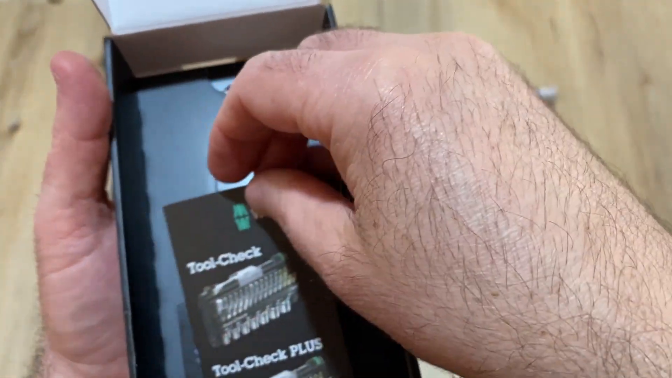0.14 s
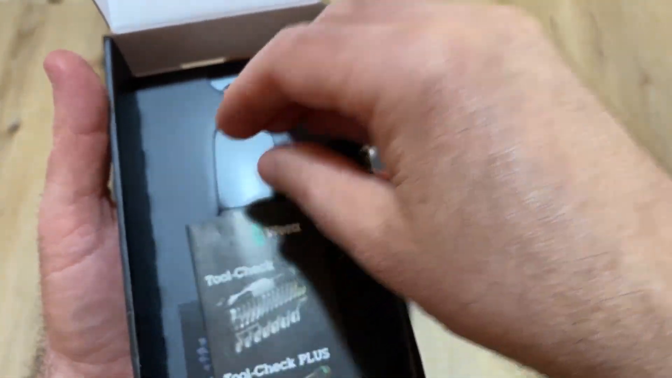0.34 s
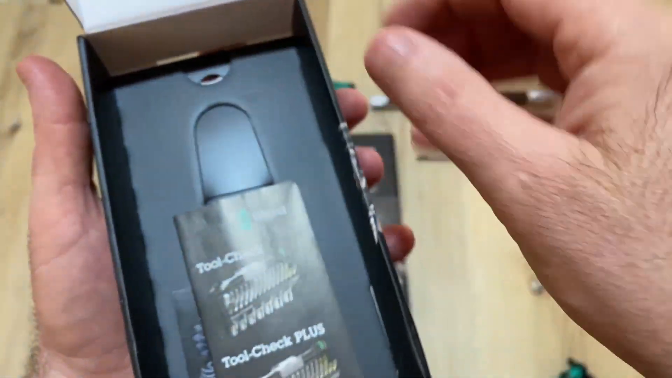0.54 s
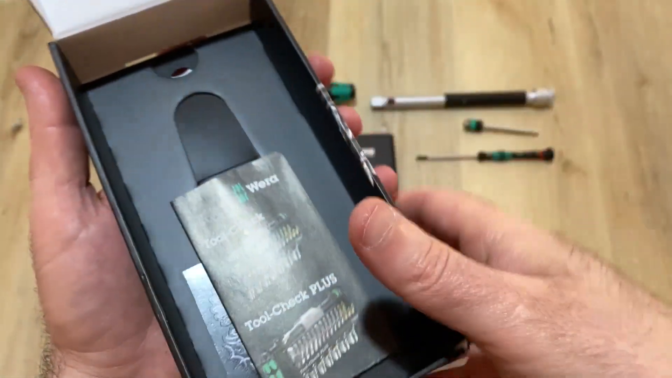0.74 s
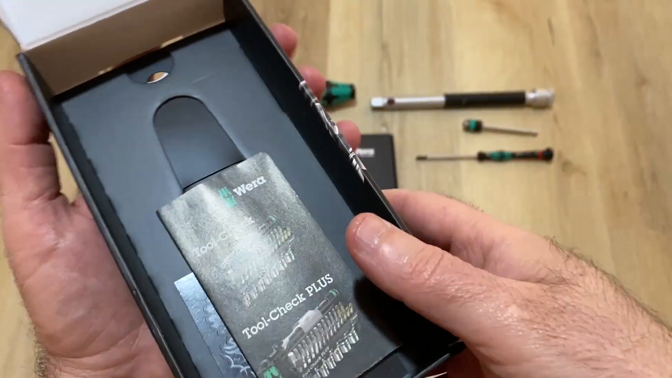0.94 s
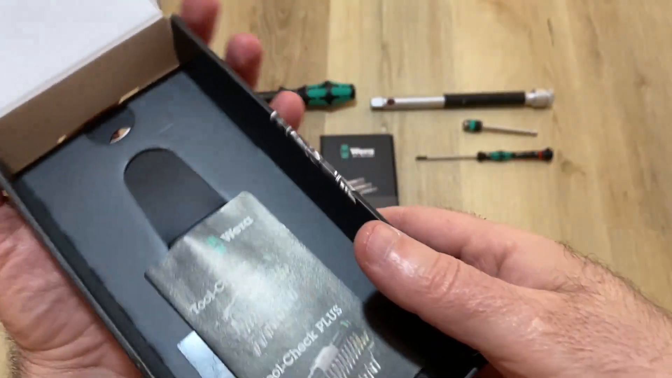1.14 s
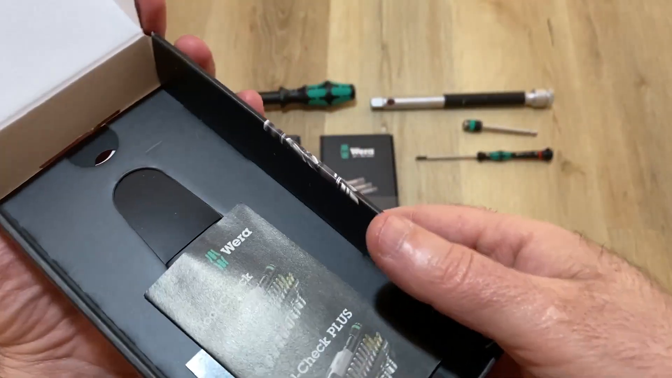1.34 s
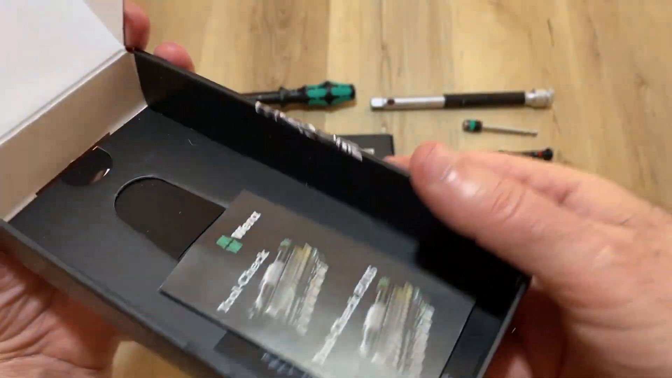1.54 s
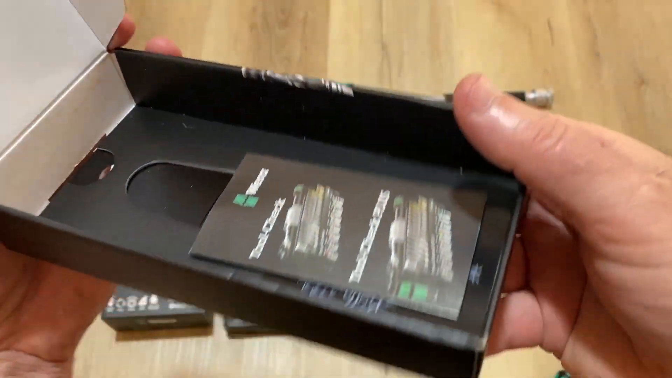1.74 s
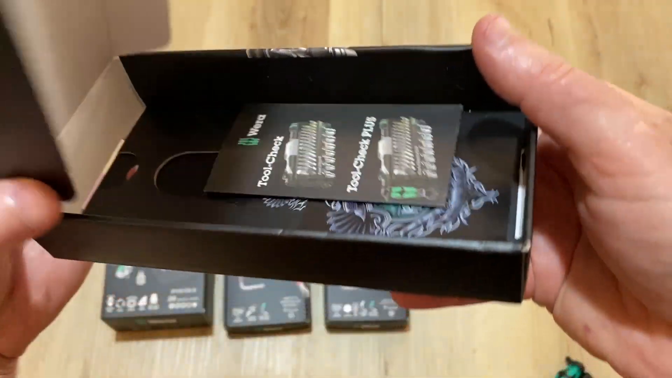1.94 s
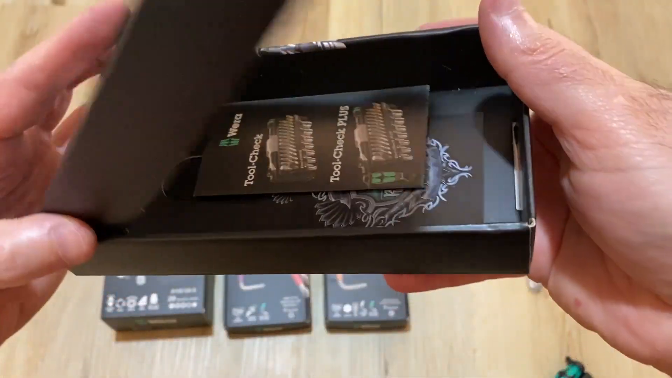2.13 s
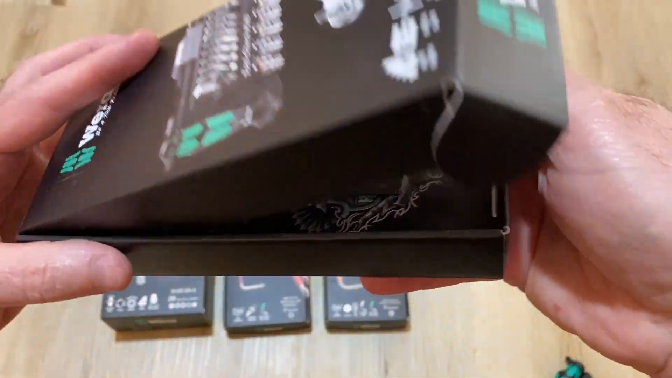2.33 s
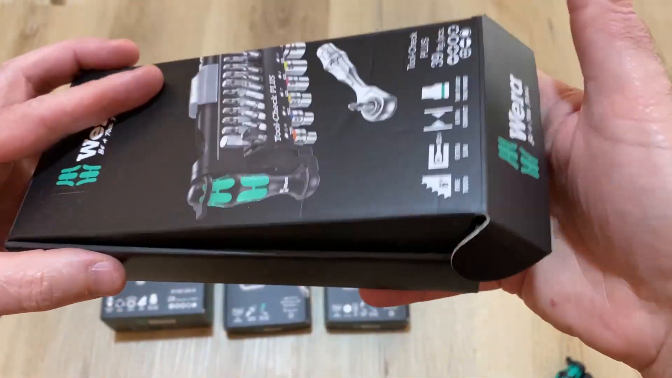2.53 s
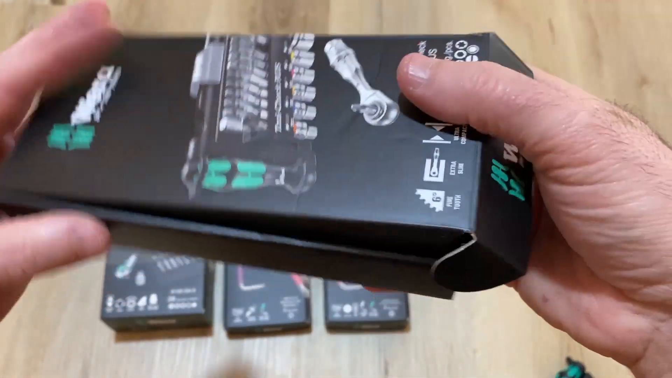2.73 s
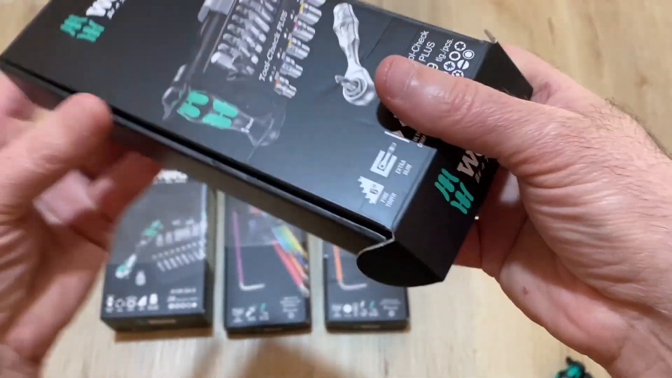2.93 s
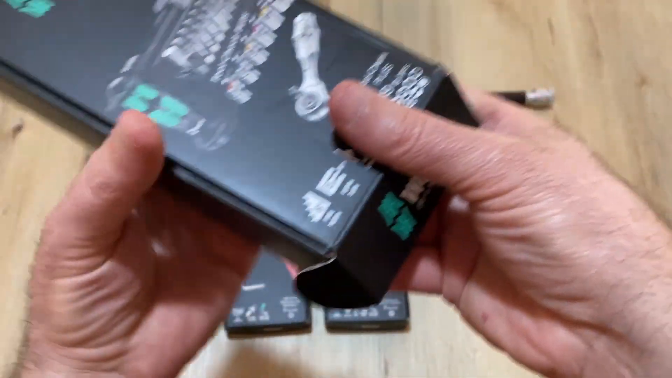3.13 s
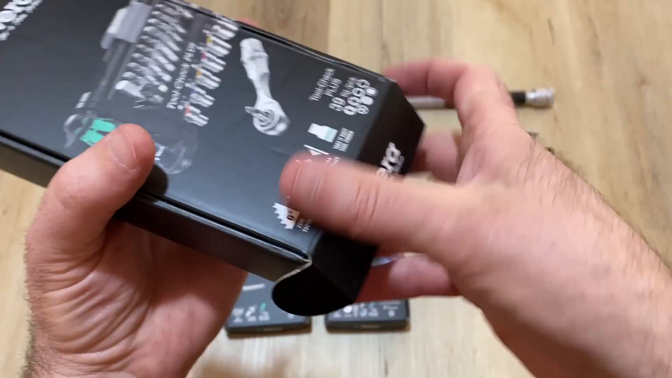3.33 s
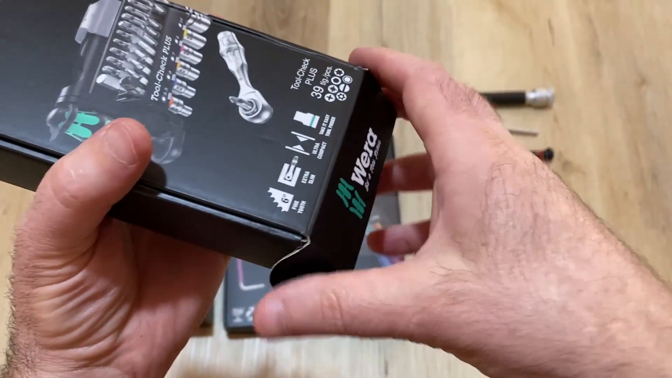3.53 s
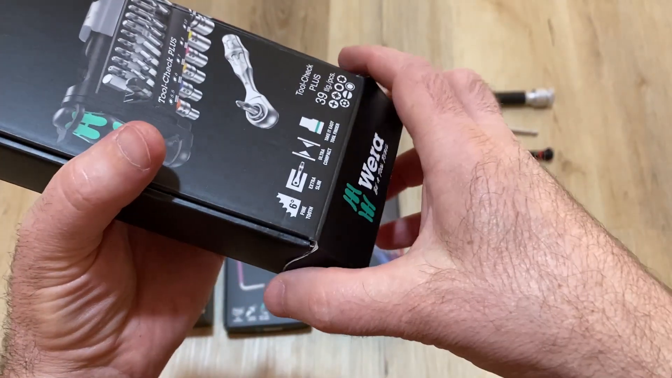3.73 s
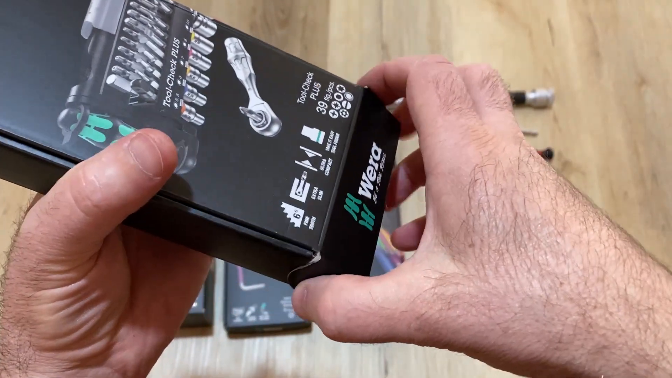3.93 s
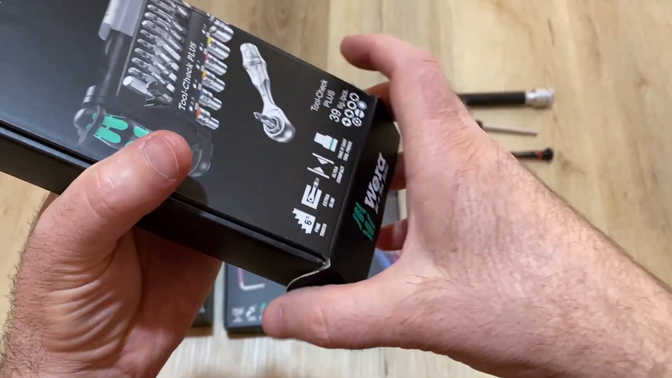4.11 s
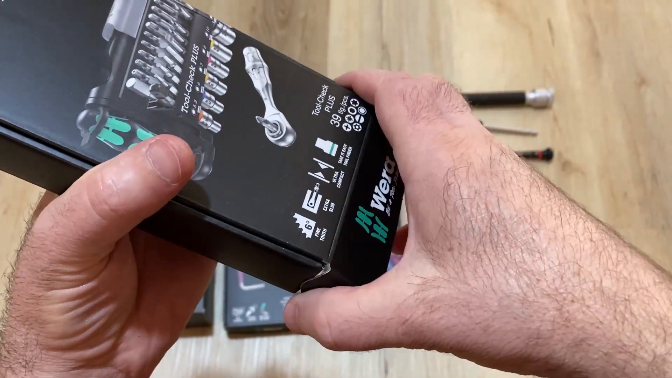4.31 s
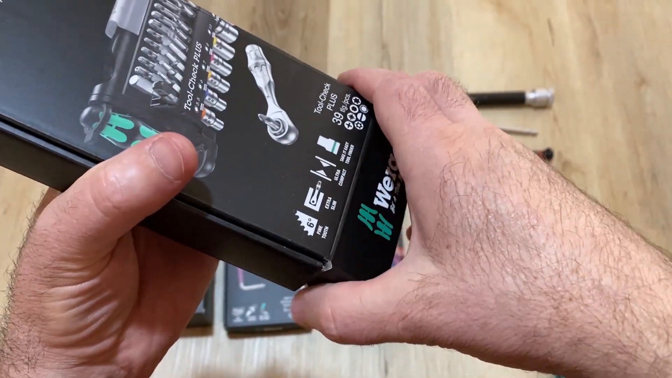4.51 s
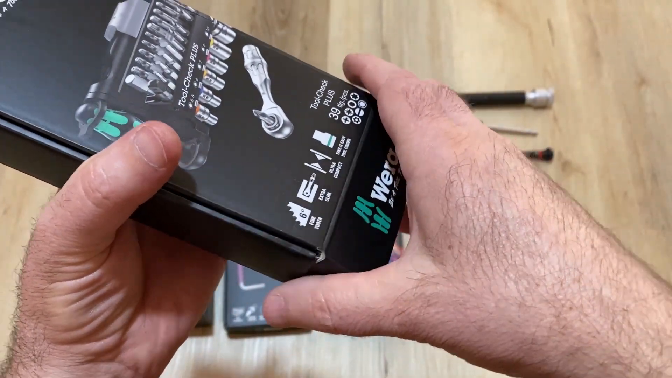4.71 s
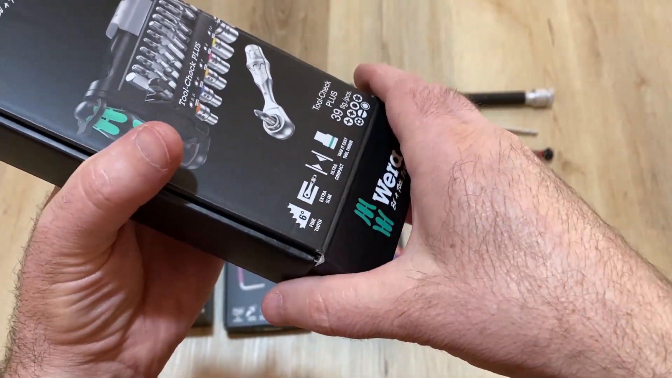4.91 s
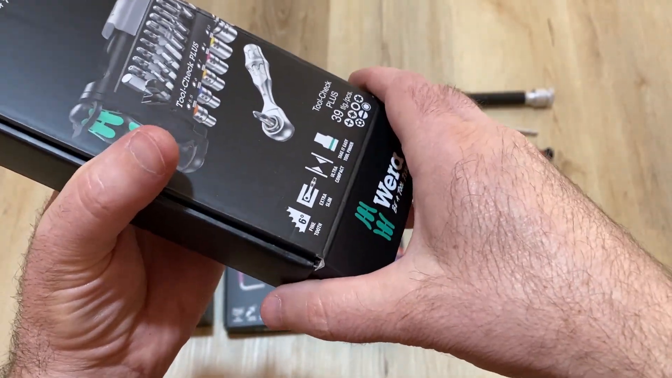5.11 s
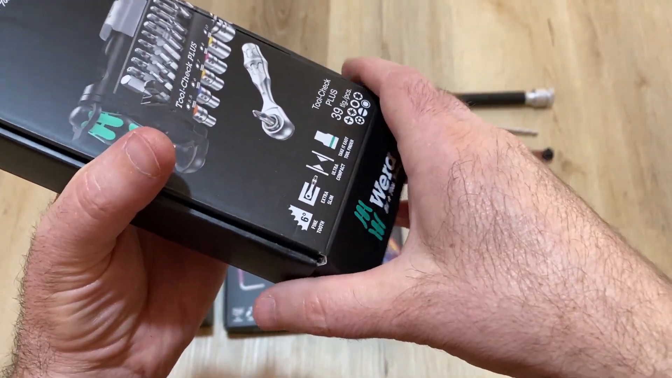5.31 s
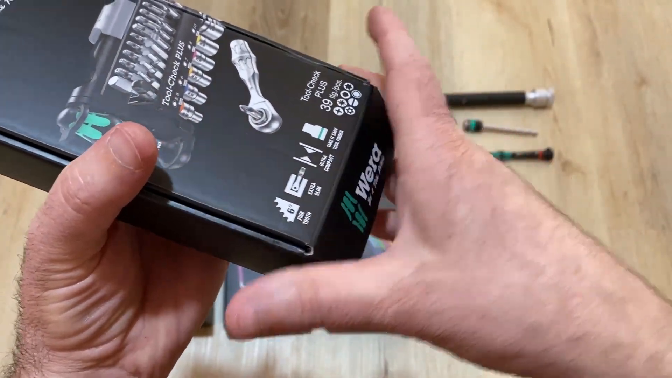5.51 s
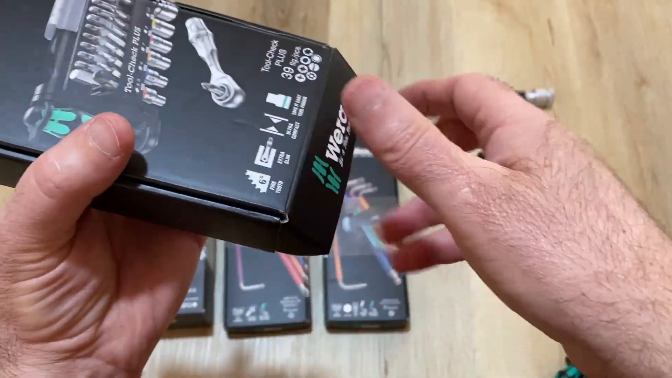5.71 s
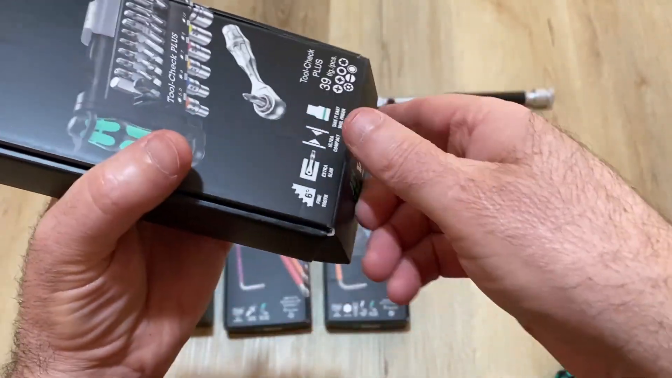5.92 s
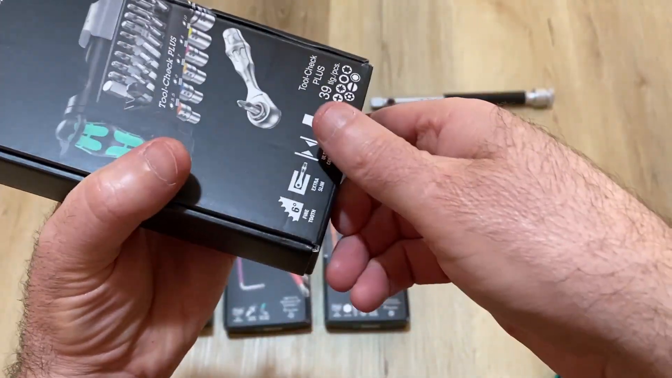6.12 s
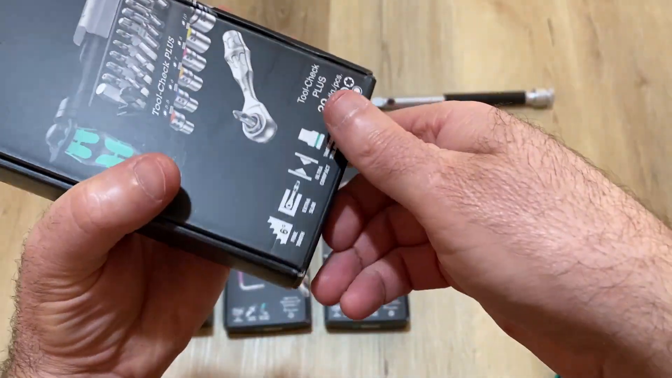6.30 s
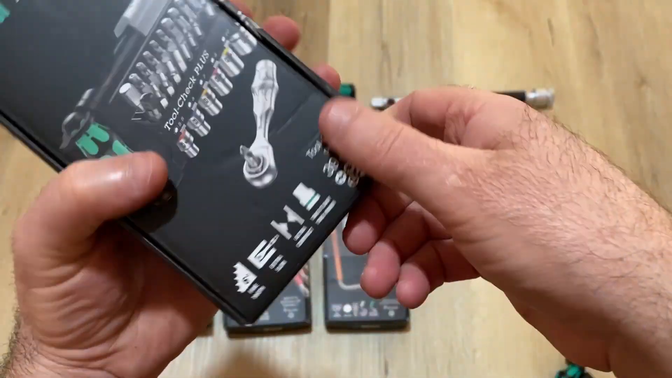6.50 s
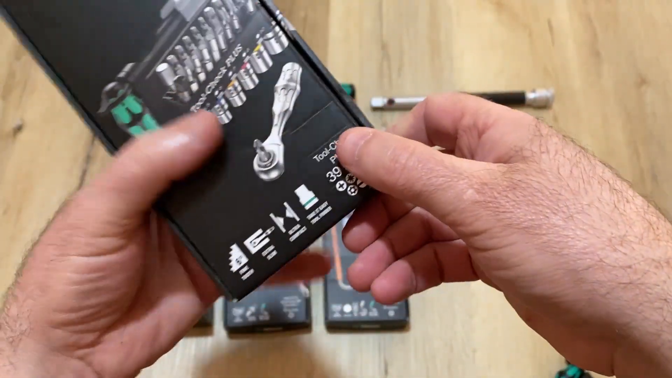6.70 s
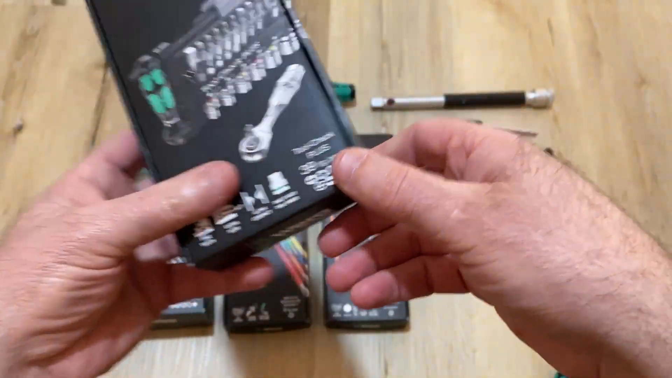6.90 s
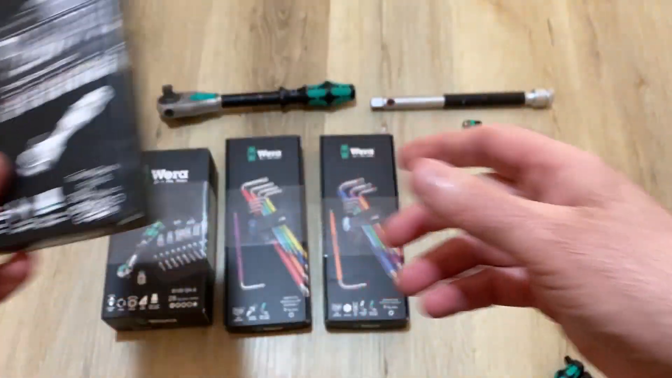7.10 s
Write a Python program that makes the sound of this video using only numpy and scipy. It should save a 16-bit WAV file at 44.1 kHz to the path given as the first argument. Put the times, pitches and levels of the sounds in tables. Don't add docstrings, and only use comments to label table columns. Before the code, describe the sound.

Close indoor handling of a hollow card box: dry paper scuffs, bright finger hiss and low hand rumble over faint room tone. A flap knocks at about two seconds, the lid creaks and rasps down, its corners click in. After a quieter stretch the tabs snap loudly, another hard clack comes soon after, and light rubbing continues to the end. Short room reflections, slight stereo movement.

```python
import sys
import numpy as np
from scipy import signal
from scipy.fft import rfft, irfft, next_fast_len
from scipy.io import wavfile
from scipy.ndimage import uniform_filter1d, map_coordinates

SR = 44100
rng = np.random.default_rng(int(sys.argv[2]) if len(sys.argv) > 2 else 0)


def digitize_waveform(pressure):
    field = np.atleast_2d(pressure).T
    bounded = np.clip(field, -1, 1)
    quanta = np.round(bounded * 32767).astype(np.int16)
    wavfile.write(sys.argv[1], SR, quanta)


def field_ratio(decibels):
    return 10 ** (np.asarray(decibels, dtype=float) / 20)


N = 315315

# f/Hz, drift/rad
PORT_LOOSE = [(200, .22), (700, .45), (1400, .85), (2500, 1.1), (4000, .9), (6000, .65), (8300, 1.05),
              (10500, .3), (14000, .12)]
SIDE = np.array([[.5], [-.5]])
SOFT_TOP_HZ = 16000


def unit(x):
    return x / np.sqrt(np.mean(x ** 2) + 1e-20)


def along(points, hz):
    f, v = np.transpose(points)
    return np.interp(np.log(hz + 1), np.log(f + 1), v)


def wobble(rate):
    knots = rng.standard_normal(int(N * rate / SR) + 4)
    return map_coordinates(knots, [np.arange(N) * rate / SR])


def patches(shape, bins, frames):
    field = uniform_filter1d(rng.standard_normal(shape), size=bins, axis=0)
    return unit(uniform_filter1d(field, size=frames, axis=1))


def filtered(x, response):
    m = 2 * next_fast_len(N // 2 + SR // 4, real=True)
    return irfft(rfft(x, m) * response(np.fft.rfftfreq(m, 1 / SR)), m)[..., :N]


def peak(f, hz, width):
    return 1j * f * width / (hz * hz - f * f + 1j * f * width)


def ringing(f, peaks):
    return sum((-1) ** k * field_ratio(db) * peak(f, hz, width) for k, (hz, width, db) in enumerate(peaks))


def causal(gain):
    cep = irfft(np.log(gain + 1e-5))
    cep[1:len(cep) // 2] *= 2
    cep[len(cep) // 2 + 1:] = 0
    return np.exp(rfft(cep))


def friction(response, grit_db, patchy_db):
    lumpy = rng.standard_normal(N) * field_ratio(grit_db * wobble(400))
    z = signal.stft(lumpy, nperseg=512)[2]
    z = z * field_ratio(patchy_db * patches(z.shape, bins=6, frames=8))
    return unit(filtered(signal.istft(z, nperseg=512)[1][:N], response))


def strokes(rows, on_db_s, off_db_s):
    t, power = np.arange(0, N, 32) / SR, 0
    for s, length, db, drift_db in rows:
        held_db = drift_db * np.clip((t - s) / max(length, 1 / SR), 0, 1)
        before_db = on_db_s * np.maximum(s - t, 0)
        after_db = off_db_s * np.maximum(t - s - length, 0)
        power = power + field_ratio(2 * (db + held_db - before_db - after_db))
    return np.interp(np.arange(N) / SR, t, np.sqrt(power))


def background():
    # f/Hz, level/dB per Hz
    rumble_colour = [(15, -38), (25, 2.5), (65, 3), (121, -5.5), (152, -7), (221, -5), (464, -16),
                     (500, -14.5), (650, -38.5), (1100, -120)]
    # f/Hz, level/dB per Hz
    quiet = [(180, -15.5), (300, -21), (472, -8), (660, -2.5), (1150, -27.5), (1630, -10.5), (2100, -25.5),
             (2320, -26), (16500, -34.5)]
    # t/s, level/dB
    jolt_rows = [(.166, -62), (.364, -53.5), (.95, -64), (1.312, -71), (2.05, -49.5), (2.15, -56),
                 (2.55, -59), (2.73, -63.5), (3.17, -62), (4.1, -66), (4.5, -49.5), (4.58, -61.5),
                 (4.81, -79), (4.942, -64), (5.09, -61.5), (5.41, -58), (5.905, -59.5), (5.98, -60.5),
                 (6.1, -59.5), (6.562, -71), (6.814, -64)]
    rumble = friction(lambda f: field_ratio(along(rumble_colour, f)), grit_db=-4.0, patchy_db=3.5)
    tone = friction(lambda f: field_ratio(along(quiet, f)), grit_db=4, patchy_db=2.0)
    jolts = strokes([(s, 0, db, 0) for s, db in jolt_rows], on_db_s=226.5, off_db_s=142)
    tremor_db, tiring_db_s = -65.5, -1
    arms = np.hypot(jolts, field_ratio(tremor_db + tiring_db_s * np.arange(N) / SR))
    lumps = field_ratio(2.5 * wobble(13))
    return arms * unit(rumble * lumps) + field_ratio(-79.5) * tone


def room(x):
    # f/Hz, t60/s
    decay = [(150, 0.33), (1000, 0.24), (5000, 0.54), (14000, 0.18)]
    hz, t, z = signal.stft(np.pad(x, (300, 0))[:N], SR, nperseg=256)
    power = uniform_filter1d(np.abs(z) ** 2, size=7, axis=0)
    keep = field_ratio(-120 * t[1] / along(decay, hz))
    held = np.array([signal.lfilter([1 - k], [1, -k], p) for k, p in zip(keep, power)])
    same, other = signal.stft(rng.standard_normal((2, N)), nperseg=256)[2]
    apart = np.clip(0.71 * along(PORT_LOOSE, hz), 0, np.pi / 4)[:, None]
    pair = np.cos(apart) * same + np.multiply.outer([1, -1], np.sin(apart) * other)
    size = np.sqrt(np.abs(held) / np.mean(np.abs(same) ** 2)) * (hz < SOFT_TOP_HZ)[:, None]
    return signal.istft(pair * size, nperseg=256)[1][:, :N]


def thumps():
    # t/s, peak level/dB, f/Hz, t60/s
    pushes = [(0.004, -48.5, 105.8, 0.33), (0.054, -49.5, 107, 0.11), (0.152, -41.5, 262, 0.06),
              (0.354, -26, 367, 0.014), (0.368, -33.5, 245, 0.027), (0.834, -47.5, 102, 0.098),
              (1.275, -45.5, 73, 0.17), (1.46, -49.5, 56.5, 0.092), (1.982, -24.5, 266.6, 0.076),
              (2.038, -31.5, 148, 0.11), (2.144, -50, 300, 0.13), (2.406, -60, 340, 0.14),
              (2.719, -40, 62.6, 0.14), (3.133, -46.5, 103, 0.053), (3.299, -58.5, 232, 0.11),
              (3.77, -54.5, 128, 0.15), (4.074, -56, 75, 0.049), (4.496, -14.5, 129, 0.038),
              (4.53, -37.5, 119, 0.19), (4.642, -44.5, 91.5, 0.062), (5.378, -51, 270, 0.051),
              (5.898, -42, 158, 0.035), (1.9825, -24, 517, 0.016), (2.034, -29, 510, 0.018),
              (4.494, -30, 416, 0.02), (1.219, -58, 270, 0.16), (1.951, -38.5, 328, .03),
              (5.135, -43, 180, 0.052), (6.823, -46, 100.6, 0.088)]
    out, t = np.zeros(N + SR), np.arange(SR // 3) / SR
    for s, db, hz, t60 in pushes:
        swing = np.sin(2 * np.pi * hz * (t + 0.0007 * (1 - np.exp(-t / 0.00087))))
        onset = 1 - np.exp(-t / 0.0015)
        out[round(s * SR):][:len(t)] += field_ratio(db - 0.5 - 60 * t / t60) * onset * swing
    return out[:N]


def lifted():
    # t/s, sinking of the strokes and grips just before/dB
    landings = [(.831, 7.5), (5.89, 27), (6.38, 8.5), (7.035, 6.5)]
    lift_s = 0.057
    s, depth_db = np.transpose(landings)
    ahead = np.subtract.outer(s, np.arange(N) / SR)
    return field_ratio(-depth_db @ ((ahead > 0) * np.exp(-np.abs(ahead) / lift_s)))


def scuffs():
    # t/s, peak level/dB, hiss/dB re peak, rise/s, tab resonance f/Hz
    drags = [(0.149, -51.5, 4, 0.0017, 3020), (.829, -81, 15, 0.0024, 2500), (2.48, -35, 6, 0.014, 2970),
             (2.5, -33.5, 9, 0.012, 3060), (2.7065, -41.5, 8.5, 0.014, 2630),
             (3.173, -36, -3, 0.0047, 3700), (3.238, -35, 10, 0.0012, 3500), (3.294, -42, 4, 0.0067, 2870),
             (3.495, -56.5, 13, 0.0037, 4630), (3.589, -60, -10, .02, 4570),
             (3.615, -59.5, -5, 0.019, 4600), (3.985, -42.5, 8, 0.0062, 1450),
             (5.084, -56.5, 6.5, 0.008, 900), (5.132, -33.5, -24.5, 0.018, 2970),
             (5.8899, -50, 12.5, 0.0036, 2200), (6.379, -69, 2.5, 0.0026, 4500),
             (7.036, -65, -1, 0.006, 4960)]
    t60 = 0.039
    card, hiss, tab = np.zeros((3, N + SR))
    t = np.arange(SR // 10) / SR
    for s, db, hiss_db, rise, hz in drags:
        swell = np.clip(t / rise, 0, 1) * field_ratio(db - 9.0 - 60 * np.maximum(t - rise, 0) / t60)
        ring = signal.lfilter(*signal.iirpeak(hz, 3.5, SR), rng.standard_normal(len(t)))
        at = slice(round(s * SR), round(s * SR) + len(t))
        card[at] += swell
        hiss[at] += field_ratio(hiss_db + 0.5) * swell
        tab[at] += field_ratio(7) * swell * unit(ring)
    catches = field_ratio(3.5 * wobble(230))
    return catches * card[:N], hiss[:N], catches * tab[:N]


def card_on_card(scuff, pressure, lift):
    # start t/s, length/s, level/dB,
    # drift/dB over the stroke, air hum/dB re level
    card_strokes = [(0, 0.045, -61.5, -8, -5), (.106, 0.11, -64, 4.5, -9), (.25, 0.088, -66.5, 1.5, -4),
                    (.38, .05, -80, -3, 18), (.47, 0.256, -88, 11, 15.5), (.79, 0.15, -59.5, -2, -5),
                    (.96, 0.34, -66, 2.5, -3.5), (1.3, 0.16, -69, 9, -8), (1.52, 0.063, -58.5, 0.5, -11),
                    (1.63, 0.24, -67.5, -5, -2), (1.85, 0.23, -66.5, 16, -8), (2.04, 0.15, -50.5, 4.5, -8),
                    (2.164, 0.31, -54, 5, -10), (2.552, 0.0025, -38.5, -2, -18),
                    (2.62, 0.053, -65, 5.5, -7.5), (2.7, 0.0051, -62.5, 14.5, -2),
                    (2.77, 0.096, -53.5, 10, -10), (2.9, 0.19, -55.5, 3.5, -5),
                    (3.25, 0.01, -58.5, -22, 8.5), (3.302, 0.015, -72.5, -6, 16.5),
                    (3.36, 0.13, -75, -6, -15.5), (3.5, 0.0093, -74, 3, 0),
                    (3.6, 0.053, -73, 2, 2.5), (3.66, 0.0081, -70, -4, 11), (3.742, 0.071, -60.5, 3.5, 6.5),
                    (3.85, 0.099, -59.5, 4.5, 1.5), (4.045, 0.029, -60.5, 1, 6), (4.19, 0.014, -67, -4, 9),
                    (4.253, 0.069, -57, 2, 4.5), (4.41, 0.096, -70, 18.5, 10),
                    (4.52, 0.19, -56.5, -3.5, -16), (4.793, 0.15, -61, -2, -4),
                    (5.02, .09, -72.5, -8.5, -10.5), (5.141, 0.11, -53.5, 0, -3.5),
                    (5.27, 0.098, -61.5, 3, 2), (5.4, 0.036, -53, -4, 1.5), (5.56, 0.044, -64, -6, -21),
                    (5.62, 0.018, -70.5, 4, 8), (5.893, 0.013, -64, 4.5, 14.5),
                    (5.91, 0.14, -53.5, 2.5, -3), (6.039, 0.09, -55, 1, -2.5),
                    (6.201, 0.061, -67.5, 8.5, -24), (6.4, 0.1, -65, 3.5, -26), (6.53, 0.24, -65, -8, -11),
                    (6.749, 0.079, -71.5, 9.5, -18), (6.82, 0.005, -70, 9, 7), (6.88, 0.13, -66, -7, -12.5),
                    (7.059, 0.086, -71, -2, -2.5)]
    # f/Hz, level/dB per Hz
    scrape_colour = [(200, -10.5), (350, -9), (550, -16), (800, -3), (1000, -3), (1900, -2), (3000, 1),
                     (4600, -7.5), (8000, -21.5), (12000, -26.5)]
    # f/Hz, width/Hz, level/dB (level unused)
    board = [(1060, 140, 0), (1450, 290, -3), (1835, 74, -2), (2020, 9.8, -4), (3004, 190, -5),
             (4550, 47, -8)]
    speed = {"on_db_s": 304, "off_db_s": 416.5}
    drags = card_strokes
    drag = lift * strokes([row[:4] for row in drags], **speed)
    air_rows = [(s, length, db + hum_db, drift_db) for s, length, db, drift_db, hum_db in drags]
    air = lift * strokes(air_rows, **speed)

    def panels(f):
        resonance = np.abs(sum(peak(f, hz, width) for hz, width, _ in board))
        return field_ratio(along(scrape_colour, f)) * (1 + 0.81 * resonance)

    scrape = (drag * field_ratio(1.6 + pressure) + scuff) * friction(panels, grit_db=-0.5, patchy_db=1.37)
    hum = friction(lambda f: peak(f, 682, 180) ** 2, grit_db=1.5, patchy_db=1.5)
    return scrape + air * field_ratio(-6.5 + pressure) * hum


def skin_on_gloss(scuff, pressure, lift):
    # start t/s, length/s, level/dB, drift/dB
    box_grips = [(0, 0.021, -69.5, 5.5), (.106, .03, -81, -3), (.165, 0.029, -60, -1),
                 (.3, 0.011, -59.5, -2), (.4, .28, -84, -4), (.706, 0.0052, -80, 14),
                 (.792, 0.0015, -68, 15), (.84, 0.088, -56.5, 2.5), (1, 0.052, -59, 3),
                 (1.075, 0.12, -48.5, -6.5), (1.25, 0.016, -50, 2), (1.47, 0.17, -49, -10),
                 (1.63, 0.31, -59, 7.5), (1.95, 0.21, -49.5, -4), (2.23, 0.16, -43.5, -18.5),
                 (2.416, 0.0024, -52, 8), (2.54, 0.014, -49, 10.5), (2.61, 0.43, -60.5, 6.5),
                 (2.856, 0.037, -49.5, 8), (2.94, 0.25, -52.5, 3), (3.25, 0.023, -46, -9),
                 (3.322, 0.1, -52, -9), (3.51, 0.002, -76.5, -16),
                 (3.598, 0.022, -79.5, 14.5), (3.76, 0.187, -63, 8), (4, 0.057, -83, -14),
                  (4.075, 0.015, -55, 5), (4.129, 0.04, -70.5, 8), (4.25, 0.027, -76.5, 12.5),
                  (4.488, .47, -65, 4), (5.018, 0.099, -68.5, -15), (5.14, 0.077, -60, 1),
                  (5.358, 0.045, -59, 12), (5.42, 0.091, -57.5, -1), (5.598, 0.051, -60, -3),
                  (5.9, 0.0022, -70.5, 20.5), (5.96, 0.16, -56.5, 3.5), (6.249, 0.066, -64.5, 1.5),
                  (6.391, 0.11, -59.5, 12), (6.5, 0.12, -55.5, 8), (6.691, 0.15, -52.5, 5.5),
                  (6.891, 0.041, -53.5, -1), (6.97, 0.078, -58, 0), (7.045, 0.1, -55.5, -6.5)]
    # f/Hz, level/dB per Hz
    skin_colour = [(1000, -41), (2500, -5), (4500, -4), (7000, -4), (10000, -1.5), (13000, -8),
                   (15500, 0.5), (16300, -27)]
    grip = lift * strokes(box_grips, on_db_s=273.5, off_db_s=481)
    hiss = friction(lambda f: field_ratio(along(skin_colour, f)), grit_db=1.5, patchy_db=1.7)
    return (grip * field_ratio(0.5 + pressure) + scuff) * hiss


def rasp(rows, peaks, grit_db):
    grains = np.repeat(rng.standard_normal(N // 64 + 1), 64)[:N]
    grit = unit(rng.standard_normal(N) * field_ratio(grit_db * grains))
    loud = np.sqrt(np.mean(np.abs(ringing(np.linspace(0, SR / 2, 2000), peaks)) ** 2))
    catches = strokes(rows, on_db_s=2501.5, off_db_s=2501.5)
    return filtered(grit * catches, lambda f: ringing(f, peaks) / loud)


def thumb_rub():
    # start t/s, length/s, level/dB, drift/dB
    rubs = [(5.932, .105, -52.5, 3.5), (6.041, .1, -52.5, -4.5), (5.141, .035, -49, 0.5),
            (1.61, 0.31, -68, 2), (.37, .06, -67, -10)]
    # f/Hz, width/Hz, level/dB
    lid = [(1700, 510, -4.5), (2160, 390, 0.5), (2970, 450, -4.5), (4500, 650, -7)]
    return rasp(rubs, lid, grit_db=0.5)


def hinge_creak():
    # start t/s, length/s, level/dB, drift/dB
    swings = [(2.061, .081, -54, 0), (2.151, 0.11, -49, -0.5), (2.261, .111, -50, -2),
              (2.391, .051, -52.5, 4), (3.746, 0.05, -59, 0), (.861, .051, -64, 2), (.969, .0051, -61, 1),
              (5.621, 0.028, -64.5, -0.5)]
    # f/Hz, width/Hz, level/dB
    open_box = [(953, 106, 2), (1530, 290, -5), (2440, 310, -10.5), (3500, 400, -10), (4700, 370, -14.5)]
    return rasp(swings, open_box, grit_db=1.5)


def rim_rasp():
    # start t/s, length/s, level/dB, drift/dB
    catches = [(2.471, 0.01, -45.5, 10), (2.483, .003, -33.5, 6), (2.4875, 0.0089, -32, -9),
               (2.5, .006, -31, 4.5), (2.5075, 0.011, -26.5, 3.5), (2.528, .024, -58, 1),
               (2.56, .02, -47, 4)]
    # f/Hz, width/Hz, level/dB
    rim = [(1033, 120, 2), (1650, 280, -6), (2900, 270, 7), (3300, 510, 4.5), (4270, 260, -3),
           (6860, 1200, -9), (10800, 6800, -12.5)]
    return rasp(catches, rim, grit_db=4)


def lid_tuck():
    # start t/s, length/s, level/dB, drift/dB
    slides = [(2.771, .071, -62, 5), (2.847, .031, -51, 2), (2.883, 0.052, -46, -5),
              (2.961, .036, -46.5, 0.5), (3.009, 0.068, -51.5, -6), (3.1745, .0081, -46, 0.5),
              (3.1865, .0021, -49, 1), (3.2365, 0.0059, -36, -5), (3.246, 0.019, -45, -7.5),
              (3.296, 0.0098, -49, -6)]
    # f/Hz, width/Hz, level/dB
    walls = [(1320, 200, 0), (2040, 160, 0.5), (2900, 300, -4.5), (3560, 280, 1.5), (4750, 220, -10),
             (6600, 380, -10)]
    return rasp(slides, walls, grit_db=3.0)


def sliding():
    card, hiss, tab = scuffs()
    lift, pressure = lifted(), wobble(25)
    rubbing = card_on_card(card, pressure, lift) + skin_on_gloss(hiss, pressure, lift)
    return rubbing + tab + thumb_rub() + hinge_creak() + rim_rasp() + lid_tuck()


def blows(rows, edge_colour):
    # f/Hz, level/dB
    crack_colour = [(700, -18), (1500, -3), (3000, 0.5), (5000, -15), (8000, -21), (15700, -25.5),
                    (16300, -71)]
    # f/Hz, width/Hz, level/dB
    tab_peaks = [(1684, 400, -0.5), (3960, 680, 9), (5000, 280, 3.5), (5640, 410, 1), (10200, 580, 1.5),
                 (12300, 340, 0.5), (15100, 850, 5.5)]
    t60, knock_cycles = 0.01, 13
    crack, edge, knock = np.zeros((3, N + SR))
    t = np.arange(SR // 8) / SR
    for s, db, knock_db, edge_db, hz in rows:
        burst = .7 * rng.standard_normal((2, len(t))) * (1 - np.exp(-t / .0004))
        burst[:, [14, 15, 31]] += [2.2, -1.2, -1.8]
        sag = t + 0.00028 * (1 - np.exp(-t / 0.0022))
        phase = 2 * np.pi * hz * sag
        ring = np.sin(phase) + 0.5 * np.sin(1.4 * phase) + 0.2 * np.sin(2.2 * phase)
        onset = 1 - np.exp(-t * hz / 0.84)
        at = slice(round(s * SR), round(s * SR) + len(t))
        crack[at] += field_ratio(db + 14.5 - 60 * t / t60) * burst[0]
        edge[at] += field_ratio(db + edge_db + 12.5 - 60 * t / (0.65 * t60)) * burst[1]
        knock[at] += field_ratio(db + knock_db + 7 - 60 * t * hz / knock_cycles) * onset * ring

    def edge_response(f):
        return causal(field_ratio(along(edge_colour, f)) * (0.64 + np.abs(ringing(f, tab_peaks))))

    def table_top(f):
        return 1 + field_ratio(-12.5) * np.exp(-2j * np.pi * f * 0.0027)

    crack = filtered(crack[:N], lambda f: causal(field_ratio(along(crack_colour, f))))
    edge = filtered(edge[:N], edge_response)
    return filtered(crack + edge + knock[:N], table_top)


def flap_blows():
    # t/s, peak level/dB, panel knock/dB re peak, edge/dB re peak, panel f/Hz
    flaps = [(0.3566, -34, -5.5, -22, 880), (1.948, -27.5, -4.5, -31, 870), (1.9797, -16, 2.5, -29, 1470),
             (1.9844, -26, 3, -17, 950), (2.413, -45, 10, -21, 795), (4.095, -54, 11.5, -14, 674),
             (4.1285, -53, -25, -7.5, 730), (.296, -68, -20, -6, 910), (5.1272, -11.5, -5, -4, 740),
             (5.9434, -47, -5, -30, 2100), (2.0385, -47.5, 11, -30, 980), (7.043, -71, -30, -2, 3000)]
    # f/Hz, level/dB
    blunt = [(2500, -30.5), (4200, 6.5), (7000, -1), (11000, -8.5), (13500, -15.5), (15900, -22.5),
             (16500, -61.5)]
    return blows(flaps, blunt)


def taps_and_snaps():
    # t/s, peak level/dB, panel knock/dB re peak, sharp edge/dB re peak, panel f/Hz
    taps = [
        (0.1494, -60, -20.5, -4, 1720),
        (2.0305, -43, 20, 3.5, 928),
        (3.237, -31.5, -4, -7, 1330),
        (3.9857, -43.5, -11, -10, 1450),
        (4.4749, -12.5, -49.5, 0, 1790),
        (4.4905, -14, -5, 0.5, 994),
    ]
    # f/Hz, level/dB
    sharp = [(2500, -39), (4500, -1.5), (6000, 0), (8000, 2.5), (11000, -7.5), (15500, -2.5), (17000, -26),
             (17400, -55)]
    return blows(taps, sharp)


def moving_hands(soft):
    hz, _, z = signal.stft(soft, SR, nperseg=512)
    turning = patches(z.shape, bins=24, frames=24)
    scatter = patches(z.shape, bins=2, frames=2)
    drift = along(PORT_LOOSE, hz)[:, None] * (.7 * turning + .85 * scatter)
    z = z * (hz < SOFT_TOP_HZ)[:, None] * np.exp(1j * SIDE[:, :, None] * drift)
    return signal.istft(z, nperseg=512)[1][:, :N]


def microphone_ports(x):
    # f/Hz, phase/turns
    port_turns = [(300, .08), (1200, .48), (2300, .63), (3000, .95), (3800, 1.05), (6600, 1.13),
                  (7500, 1.03), (12000, 1.05)]
    # f/Hz, level/dB
    port_db = [(200, .2), (500, -2.5), (800, -1.5), (1300, 3), (2300, 1), (3800, 4.5), (7500, 1.5),
               (9000, -.2)]
    lag_s, top_hz = 8.3 / SR, 17100

    def response(f):
        turns = np.exp(2j * np.pi * SIDE * (along(port_turns, f) - f * lag_s))
        capsule = (f < top_hz) * f ** 4 / (f ** 4 + 50 ** 4)
        return field_ratio(SIDE * along(port_db, f)) * turns * capsule

    return filtered(x, response)


def scene():
    hits, rub = taps_and_snaps() + flap_blows(), sliding()
    soft = rub + thumps() + background()
    walls = room(field_ratio(-12.0) * hits + field_ratio(-12.0) * rub)
    return field_ratio(0.5) * microphone_ports(moving_hands(soft) + walls + hits)


def top_cut(x):
    return signal.sosfilt(signal.butter(12, 17130, fs=SR, output="sos"), x)


def record(dry):
    return top_cut(dry)


dry = scene()
out = record(dry)
digitize_waveform(out)
```